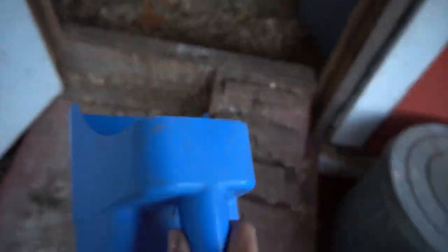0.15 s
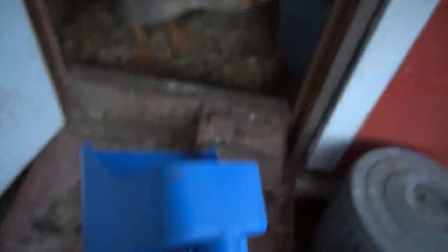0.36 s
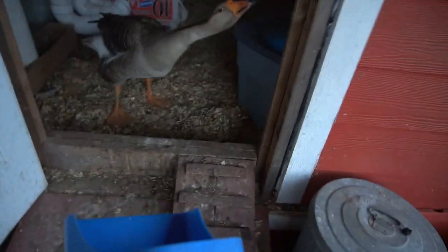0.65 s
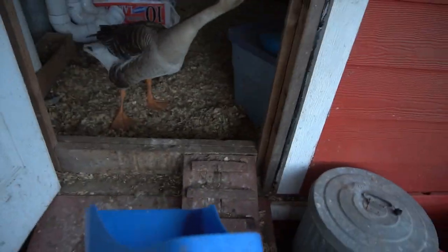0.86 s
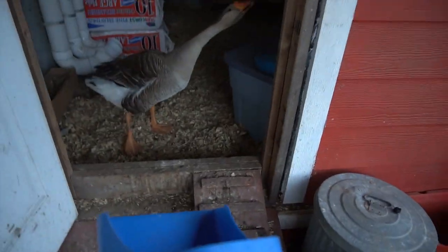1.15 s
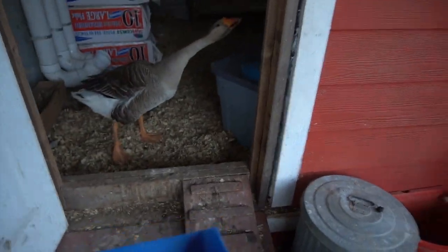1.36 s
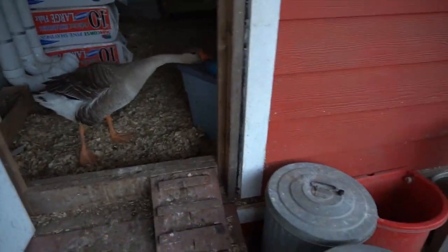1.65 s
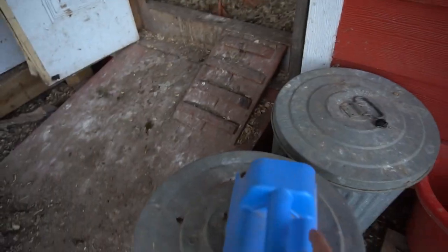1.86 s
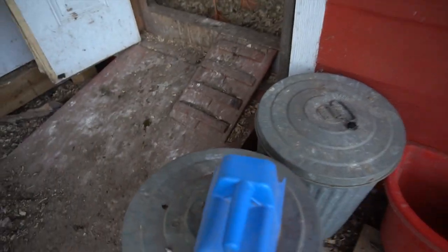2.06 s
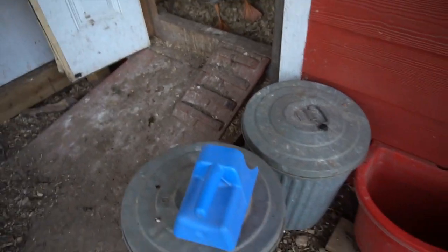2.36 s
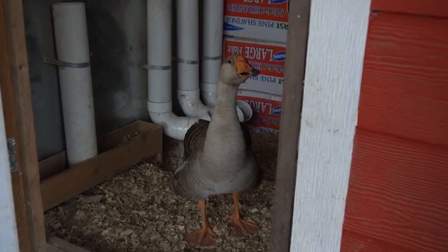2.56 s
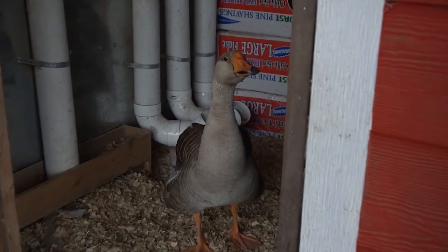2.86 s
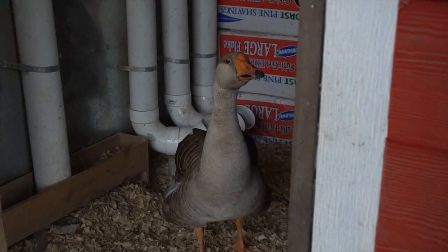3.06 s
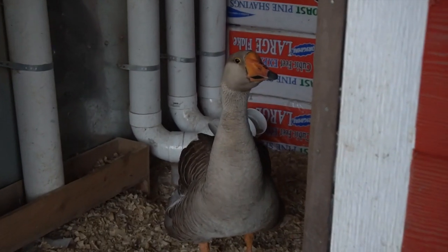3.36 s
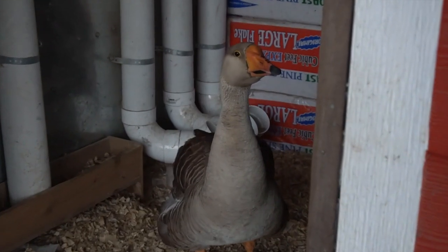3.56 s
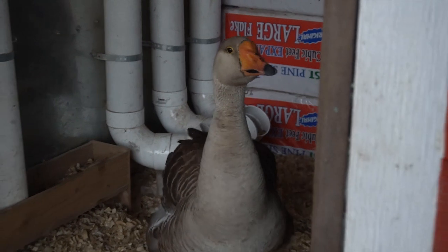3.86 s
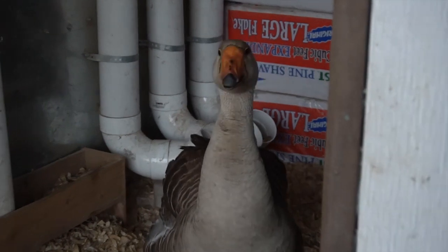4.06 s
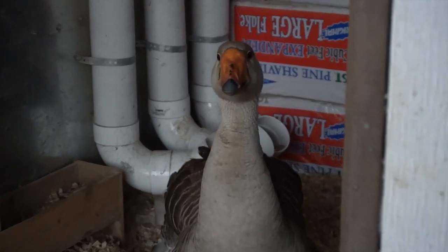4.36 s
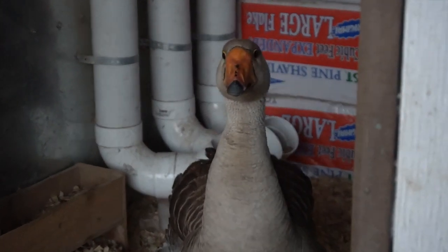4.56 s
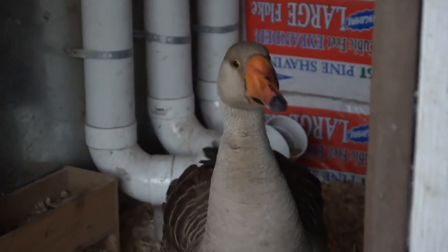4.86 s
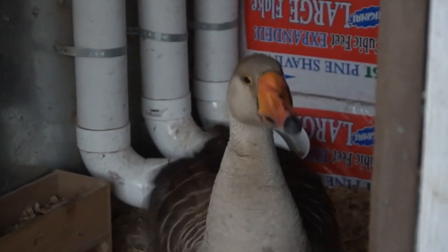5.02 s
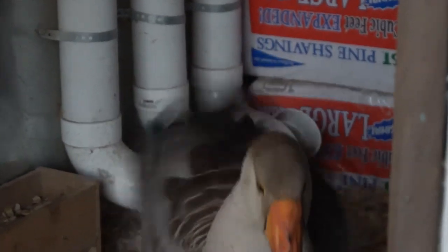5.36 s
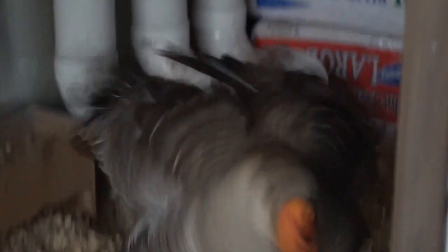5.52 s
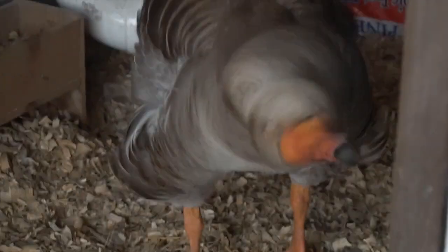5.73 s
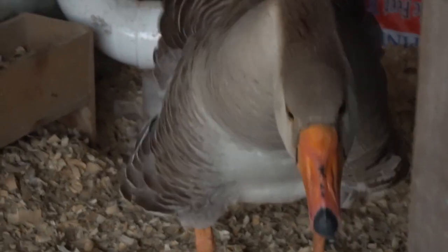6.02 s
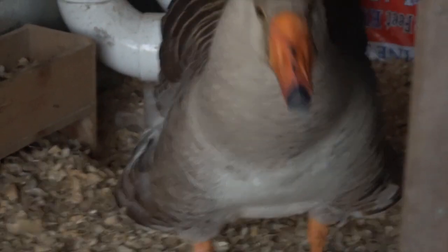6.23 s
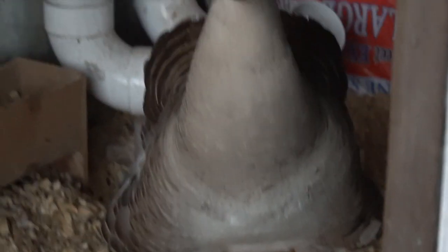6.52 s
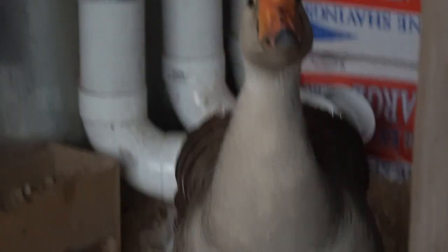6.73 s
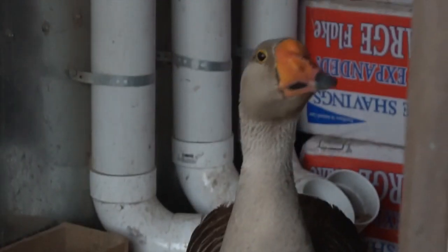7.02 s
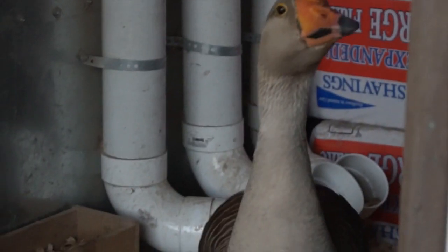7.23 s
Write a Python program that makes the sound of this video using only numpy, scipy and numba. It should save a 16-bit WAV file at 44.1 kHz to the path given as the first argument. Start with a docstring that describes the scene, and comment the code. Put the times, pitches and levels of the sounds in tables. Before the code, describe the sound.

A goose honks harshly about seven times in quick succession from the start until 1.4 seconds, its voice cracking shrilly in the later calls, with the short echo of a small wooden shed. Low wind buffets the microphone, and a hand bumps it at 0.3 and around 1.6 seconds. At 1.7 seconds a plastic scoop clatters onto a bin and rattles away by 2.3. Two short honks follow at 2.5 and 2.7 seconds, and two more at 4.1 and 4.4. A small bird gives one clear, thin peep at 3.7. From about 3 seconds the goose steps lightly on dry shavings and rustles its feathers, busiest between 5.1 and 6 seconds. Very faint peeps come between 6 and 7.2 seconds, and a last honk at 7.3. A faint drone of open air continues throughout.

```python
"""At the door of a small wooden shed bedded with shavings, a goose honks harshly, ruffles its feathers
and steps about. Its voice is a source and filter: pulsing membranes excite resonances of throat and bill.
A plastic feed scoop clatters on a bin, ringing the modes of both, and a small bird peeps in thin whistles.
The boards reflect all these sounds. Wind buffets the microphone and a hand bumps it, over a faint drone."""
import sys
import numpy as np
from scipy import signal
from scipy.fft import rfft, irfft, next_fast_len
from scipy.io import wavfile
from scipy.ndimage import uniform_filter1d
from numba import njit

SR = 44100
rng = np.random.default_rng(int(sys.argv[2]) if len(sys.argv) > 2 else 0)


def file_out(sig):
    """Save sig as 16-bit WAV at sys.argv[1]."""
    # one column per channel
    cols = np.atleast_2d(sig).T
    # limit, then scale
    lim = np.clip(cols, -1, 1)
    pcm = np.round(lim * 32767).astype(np.int16)
    wavfile.write(sys.argv[1], SR, pcm)


N = 325899
TIME = np.arange(N) / SR

# Honks, with the bill wide open. Each row: start, length and attack in seconds, level in dB, relative
# levels of the low, middle and top resonances in dB, pulses per second, share of pitch lost as the bill
# shuts, roughness from 0 to 1, first resonance in Hz, bill resonance in Hz.
HONKS = [(0, 0.024, 0.001, -15, 7, -4, 0.5, 145.3, .03, 0.27, 1045, 3370),
         (.378, .155, 0.026, -23.5, 4, 1, -2.5, 152, .2, 0.26, 770, 3450),
         (.618, .076, 0.029, -25.5, 18, 0.5, -6.5, 140.4, .15, 0.26, 714, 3260),
         (.697, .108, 0.0013, -16, -6, -3, -3, 149, .04, .08, 1145, 3330),
         (.856, .135, .014, -17.5, -7, -2, -1.5, 152, .09, .09, 994, 3000),
         (1.018, .18, 0.097, -16.5, 4.5, -0.5, -6.5, 280, .14, .2, 1180, 2700),
         (1.222, 0.18, 0.0032, -17.5, -4, 0, 0.5, 178, .28, 0.22, 1010, 3370),
         (2.531, .024, 0.00067, -15.5, -3, -4.5, -4, 145, 0.029, 0.28, 1045, 3186),
         (2.713, .112, 0.0086, -18, -5, -4.5, -2.5, 170, .15, .17, 1007, 3185),
         (4.068, 0.097, 0.0068, -13.5, 4, -4.5, -3, 149.5, .02, .17, 946, 3406),
         (4.308, 0.015, 0.0037, -37, 3, -0.5, -14, 142, .03, 0.34, 702.4, 3200),
         (4.401, 0.083, 0.0072, -13.5, 3.5, -5.5, -2, 170, 0.18, 0.09, 1012, 3430),
         (7.286, 0.083, 0.014, -15, 7, -8, -6, 146, 0.044, .15, 940, 3350)]
# Resonances of throat and bill at an average opening. Each row: centre in Hz, width in Hz, gain in dB.
THROAT_LOW = [(551, 78, -12.5)]
THROAT_MID = [(1457, 292, -1), (1727, 204, -0.5), (2050, 170, -5)]
THROAT_TOP = [(2530, 780, -1.5), (3420, 870, 3.5), (4520, 300, -2), (5500, 810, -6.5)]
# Cracks of the voice. Each row: time of the peak in seconds, pitch in Hz, level in dB.
SHRIEKS = [(0.802, 2870, -15), (1.175, 2670, -13), (1.243, 3310, -13), (1.348, 3060, -17)]
# Clear tones in the voice. Each row: start and length in seconds, first and last pitch in Hz,
# level in dB, gain of the overtones in dB.
CLEAR_TONES = [(1.071, .11, 520, 571.4, -36, 13.5), (2.532, 0.0092, 1070, 1026, -13.5, -20),
               (2.71, 0.023, 691, 797, -17.5, -3), (2.735, 0.07, 972, 968, -13, -24),
               (4.067, 0.01447, 660, 732, -27.5, 5.5), (4.403, 0.013, 680, 737, -26.5, 4.5),
               (7.283, .02, 645, 728, -25, 0), (7.326, 0.0298, 1001, 899, -20, -11.5)]
# The scoop lands on the bin. Each row: time in seconds, relative level in dB.
KNOCKS = [(1.735, 1), (1.741, -6), (1.785, -6), (1.8, -10), (1.827, -9), (1.845, -6)]
# Modes of scoop and bin. Each row: frequency in Hz, relative level in dB, 60 dB decay time in seconds.
SCOOP_MODES = [(259.2, -9, 0.34), (425, 2.5, 0.11), (502, -1.5, 0.084), (546, -12.5, 0.86),
               (613, -11, 0.28), (1296, -2, 0.069), (2700, -15, 0.095), (3470, -8, 0.062),
               (5280, -16, 0.043)]
# Steps on shavings. Each row: time in seconds, relative level in dB, extra gain of the thud in dB.
STEPS = [(0.193, -23, -21), (2.927, -19, -21), (3.16, -24.5, -4), (3.793, -29.5, 8.5), (3.864, -28, 7),
         (4.903, -22, -5), (5.399, -19.5, -1.5), (5.493, -24.5, 5), (5.514, -16, -14), (5.665, -14, -9.5),
         (5.767, -21, -21), (5.914, -13, -13), (6.012, -17, -24), (6.766, -26.5, -13)]
# Bouts of rustling. Each row: start and length in seconds, relative levels of crackle and brush in dB.
RUSTLES = [(3.27, .13, -48, -41.5), (3.794, 0.17, -57, -45.5), (4.782, 0.085, -41.5, -61),
           (5.138, 0.4, -44, -42.5), (5.572, 0.08, -36.5, -34.5), (5.712, 0.3, -49, -63),
           (6.59, 0.13, -54, -56)]
# Spectra of the contact noises. Each row: frequency in Hz, relative level in dB.
CLACK_SPECTRUM = [(220, -6.5), (330, -10.5), (430, 2), (700, -3.5), (1000, -5), (1800, -15.5), (3200, -14),
                  (5000, -28), (12000, -57)]
SNAP_SPECTRUM = [(900, 10), (1500, 8.5), (2200, 4), (4000, 9.5), (7000, -2), (12000, -7.5)]
CRACKLE_SPECTRUM = [(1800, 1), (5500, 5.5), (7500, -3), (12000, -5)]
BRUSH_SPECTRUM = [(220, -3), (380, 3), (900, -1), (1600, -4.5), (2800, -12.5)]
# The bird's peeps. Each row: start and length in seconds, first and last pitch in Hz, final level in dB.
PEEPS = [(3.672, 0.09, 3422, 3485, -17), (6.08, .16, 3380, 3210, -60), (6.93, 0.086, 2670, 2780, -44.5),
         (7.126, 0.061, 3260, 3324, -38.5), (7.196, 0.068, 3290, 3048, -44.5)]
# Reverberation of the shed. Each row: frequency in Hz, 60 dB decay time in seconds.
SHED_T60 = [(200, 0.37), (1500, 0.22), (11000, 0.28)]
# Gusts. Each row: time of the peak and half width in seconds, relative level in dB.
GUSTS = [(.08, 0.27, -24), (.52, 0.19, -20.5), (1.58, 0.1352, -18), (2.2, 0.76, -37), (5.6, 0.22, -48)]
# The hand bumps the microphone. Each row: time in seconds, level in dB, length in seconds.
BUMPS = [(0.322, -1.5, 0.011), (0.343, 3, 0.015), (1.513, -2.5, 0.0087), (1.571, 0.5, 0.011),
         (1.631, 2, 0.0083), (1.655, -0.5, 0.0087)]
# Spectra of slow sway, fast buffets and open air. Each row: frequency in Hz, relative density in dB.
SWAY_SPECTRUM = [(8, -6), (12, 2), (24, -4), (45, -36.5), (80, -54.5)]
BUFFET_SPECTRUM = [(35, -15), (58, 4.5), (90, -19), (150, -20.5), (250, -42), (500, -59)]
AIR_SPECTRUM = [(70, 5.5), (95, -3), (120, 6.5), (165, -7.5), (280, -11), (365, -7), (550, -13.5),
                (1300, -17.5), (2300, -27.5), (3600, -28), (6000, -38), (12000, -45.5)]
# Level curves of the sway and of the open air. Each row: time in seconds, level in dB.
SWAY_LEVELS = [(0.0, -16.5), (0.08, -12.5), (0.88, -16.5), (0.97, -30.5), (1.63, -15.5), (1.77, -27),
               (3.48, -16.5), (4.55, -27.5), (6.77, -14), (6.93, -20.5), (7.18, -11.5), (7.39, -22)]
AIR_LEVELS = [(0, -46), (2.5, -46.5), (2.6, -41), (4, -39.5)]


def honks(release_s=.011, bill_lag_s=.012, width_hz=200, flutter_db=2, average_first_hz=913):
    """Source and filter: pulses ring in the throat; opening the bill lifts pitch, resonances and level."""
    age, length, attack, db, low_db, mid_db, top_db, per_s, bend, rough, first_hz, bill_hz = held(HONKS)
    shut = (2 * np.clip(age / (length + bill_lag_s), 0, 1) - 1) ** 2   # 1, 0, 1 over each honk
    db = db - 3.5 * shut
    first_hz = first_hz * .69 ** shut
    bill_hz = bill_hz * .875 ** shut
    mid_db = mid_db - 1.5 + flutter_db * drift(60)
    top_db = top_db - 3 + flutter_db * drift(60)
    slaps, air = syrinx(per_s * (1 - bend * shut), rough)
    # close boards thicken each pulse
    voice = shed(slaps + air / 2, wet_db=3.5)
    hoarse = shed(slaps + air, wet_db=4.5)
    first = gliding(voice, [(first_hz, width_hz, 0)], 1) + from_db(low_db) * resonances(voice, THROAT_LOW)
    first = evened(cut(cut(first, 493, "high", order=8), 1090, "low", order=6))
    scale = (first_hz / average_first_hz) ** .24   # higher resonances partly follow the first
    middle = evened(cut(gliding(voice, THROAT_MID, scale), [1150, 2400], "band", order=3))
    upper = evened(cut(gliding(hoarse, THROAT_TOP, scale), [2100, 5800], "band", order=5))
    bill = moving_resonance(hoarse, 2 * np.pi * bill_hz / SR, np.exp(-np.pi * width_hz / SR))
    bill = from_db(-1) * evened(cut(bill, [2100, 4800], "band"))
    # harder pulses have a sharper edge
    fizz = from_db(-19 + .41 * (db - np.max(db))) * evened(cut(hoarse, [5800, 9500], "band"))
    chest = from_db(-21) * evened(cut(voice, [125, 185], "band"))
    throat = first + chest + from_db(mid_db) * middle + from_db(top_db) * (upper + bill + fizz)
    return envelope(age, length, attack, release_s) * (from_db(db) * throat + shrieks(hoarse))


def syrinx(per_s, rough, jitter=.16, uneven_db=7, leak=.08, puff_s=.0025):
    """Valve action: membranes slap shut in uneven pulses, each releasing a puff of turbulent air."""
    cycles = np.cumsum(per_s * np.exp(jitter * rough * drift(150))) / SR
    slaps = np.diff(np.floor(cycles), prepend=-1) * from_db(uneven_db * rough * drift(300))
    puffs = signal.lfilter([1], [1, -np.exp(-1 / (puff_s * SR))], slaps)
    air = rms_one((puffs + leak * rough) * noise())
    return rms_one(slaps), np.sqrt(np.abs(rough)) * air


def shrieks(hoarse, half_length_s=.012, width_hz=220):
    """Narrow-band resonance: for a moment one high peak takes over the voice."""
    out, treble = 0, cut(hoarse, [2100, 5800], "band")
    for s, hz, db in SHRIEKS:
        ringing = evened(resonances(treble, [(hz, width_hz, 0)]))
        out = out + from_db(db) * np.exp(-((TIME - s) / half_length_s) ** 2) * ringing
    return out


def clear_tones(waver=.00753, rolloff_db=-2.5):
    """Free oscillation: at times the membranes swing at a much higher pitch, giving a harmonic series."""
    out, wobble = 0, waver * drift(300)
    for s, length, start_hz, end_hz, db, overtone_db in CLEAR_TONES:
        phase = glide(TIME - s, length, start_hz, end_hz, wobble)
        gate = envelope(TIME - s, length, attack_s=.0046, release_s=.0083)
        overtones = sum(from_db(rolloff_db * (k - 1.5)) * np.sin(k * phase) for k in range(2, 9))
        out = out + gate * from_db(db) * np.sqrt(2) * (np.sin(phase) + from_db(overtone_db) * overtones)
    return out


def scoop(ring_db=-17, scatter_db=4.84):
    """Impact excitation: each knock rings the damped modes of scoop and bin, with a clack and a crack."""
    s, db = np.transpose(KNOCKS + rattle())
    rings = 0
    for hz, mode_db, t60 in SCOOP_MODES:
        r, angle = from_db(-60 / (t60 * SR)), 2 * np.pi * hz / SR
        hits = strikes(s, db + mode_db + ring_db + rng.normal(0, scatter_db, len(s)))
        rings = rings + signal.lfilter([0, np.sin(angle)], [1, -2 * r * np.cos(angle), r * r], hits + 1e-18)
    clack = bursts(s, db - 11, CLACK_SPECTRUM, t60=.18)
    crack = bursts(s, db - 20, SNAP_SPECTRUM, t60=.016)
    return rings + clack + crack


def rattle(count=11, start_s=1.9, gap_s=.0315, jitter_s=.003, first_db=-17, loss_db=.57):
    """Damped rocking: the scoop knocks on the rim at an almost steady beat, weakening as it goes."""
    bounce = np.arange(count)
    times = start_s + gap_s * bounce + jitter_s * rng.standard_normal(count)
    return list(zip(times, first_db - loss_db * bounce))


def steps():
    """Brittle fracture: dry shavings crack underfoot, over a soft thud."""
    s, db, thud_db = np.transpose(STEPS)
    snaps = bursts(s, db - 9, SNAP_SPECTRUM, t60=.047)
    thuds = bursts(s, db + thud_db - 10, BRUSH_SPECTRUM, t60=.13)
    return snaps + thuds


def rustle(grains_per_s=3000, clump_db=5):
    """Superposition: clumps of tiny contacts in feathers and shavings sum to crackle and dull brushing."""
    grains = noise() * (rng.random(N) < grains_per_s / SR)
    crackle = rms_one(colour(grains, CRACKLE_SPECTRUM))
    brush = rms_one(colour(grains, BRUSH_SPECTRUM))
    bouts = 0
    for s, length, crackle_db, brush_db in RUSTLES:
        contacts = from_db(crackle_db - 1) * crackle + from_db(brush_db - 2) * brush
        bouts = bouts + envelope(TIME - s, length, attack_s=.05, release_s=.036) * contacts
    return from_db(clump_db * drift(70)) * bouts


def peeps(waver=.012, swell_db=8.5, hiss_db=-19, ring_db=-17.5):
    """Nonlinear oscillation: a small bird's thin, hoarse whistles have stronger harmonics when louder."""
    out, wobble = 0, waver * drift(900)
    hiss = from_db(hiss_db) * rms_one(colour(noise(), CRACKLE_SPECTRUM))
    loudest_db = max(row[-1] for row in PEEPS)
    for s, length, start_hz, end_hz, db in PEEPS:
        age = TIME - s
        phase = glide(age, length, start_hz, end_hz, wobble)
        overtones = from_db(-17) * np.sin(2 * phase) + from_db(-20) * np.sin(3 * phase)
        whistle = np.sin(phase) + from_db(.36 * (db - loudest_db)) * overtones
        gate = envelope(age, length, attack_s=.011, release_s=.008)
        # the pitch lingers faintly
        ring = from_db(ring_db) * envelope(age, length, attack_s=length, release_s=.16) * np.sin(phase)
        swell = from_db(db + swell_db * (np.clip(age / length, 0, 1) - 1))
        out = out + swell * (gate * (whistle + hiss) + ring)
    return out


def shed(x, wet_db, first_echo_s=.0037):
    """Reverberation: dense reflections from the boards follow the direct sound and die band by band."""
    t, tail = TIME[:SR // 2], 0
    for low_hz in 100 * 2. ** np.arange(7):
        octave = cut(rng.standard_normal(len(t)), [low_hz, 2 * low_hz], "band")
        tail = tail + octave * from_db(-60 * t / at_hz(SHED_T60, low_hz * np.sqrt(2)))
    tail = tail * (t > first_echo_s)
    reflections = signal.fftconvolve(x, tail / np.sqrt(2 * np.sum(tail ** 2)))[:N]
    wet = from_db(wet_db)
    return (x + wet * reflections) / np.sqrt(1 + wet ** 2)


def wind():
    """Turbulence: pressure sways slowly at the microphone port, and faster buffets swell with each gust."""
    sway = evened(colour(noise(), SWAY_SPECTRUM), window_s=.091)
    buffets = evened(colour(noise(), BUFFET_SPECTRUM), window_s=.24)
    gusts = sum(from_db(db - 1) * np.exp(-((TIME - s) / width) ** 2) for s, width, db in GUSTS)
    return gain_curve(SWAY_LEVELS) * sway + gusts * buffets


def bumps():
    """Pressure pulses: each bump of the hand is one smooth swell; the port passes no steady pressure."""
    pressure = sum(from_db(db) / (1 + (2 * (TIME - s) / length) ** 2) ** 2 for s, db, length in BUMPS)
    return cut(pressure, 10, "high", order=1)


def open_air():
    """Ambient noise: low peaks in a broad spectrum are heard as a faint drone."""
    return gain_curve(AIR_LEVELS) * rms_one(colour(noise(), AIR_SPECTRUM))


def resonances(x, modes):
    """Parallel resonances with alternating signs."""
    out = 0
    for k, (hz, width, db) in enumerate(modes):
        r = np.exp(-np.pi * width / SR)
        feedforward = np.array([1, 0, -1]) * (1 - r * r) / 2
        feedback = [1, -2 * r * np.cos(2 * np.pi * hz / SR), r * r]
        out = out + (-1) ** k * from_db(db) * signal.lfilter(feedforward, feedback, x)
    return out


def gliding(x, modes, scale):
    """Parallel resonances with alternating signs, whose centres all move by one factor."""
    out = 0
    for k, (hz, width, db) in enumerate(modes):
        r = np.exp(-np.pi * width / SR)
        out = out + (-1) ** k * from_db(db) * (1 - r) * moving_resonance(x, 2 * np.pi * hz * scale / SR, r)
    return out


@njit
def moving_resonance(x, angle, r):
    """A two-pole resonator whose centre, in radians per sample, glides."""
    y = np.zeros(len(x))
    for i in range(2, len(x)):
        y[i] = x[i] - x[i - 2] + 2 * r * np.cos(angle[i]) * y[i - 1] - r * r * y[i - 2]
    return y


def strikes(times, db):
    """One impulse of the given level at each time."""
    out = np.zeros(N)
    out[np.clip((np.asarray(times) * SR).astype(int), 0, N - 1)] = from_db(db)
    return out


def bursts(times, db, spectrum, t60):
    """Exponential decay: a puff of coloured noise at each time falls 60 dB in t60 seconds."""
    power = signal.lfilter([1], [1, -from_db(-60 / (t60 * SR)) ** 2], strikes(times, db) ** 2 + 1e-18)
    return np.sqrt(power) * rms_one(colour(noise(), spectrum))


def envelope(age, length, attack_s, release_s):
    """Linear attack, hold, exponential release."""
    return np.clip(age / attack_s, 0, 1) * np.exp(-np.maximum(age - length, 0) / release_s)


def glide(age, length, start_hz, end_hz, wobble):
    """Phase as the integral of a sliding frequency."""
    return 2 * np.pi * np.cumsum(np.interp(age, [0, length], [start_hz, end_hz]) * (1 + wobble)) / SR


def held(rows):
    """At every sample, the time since the latest event began, then that event's columns."""
    rows = np.array(rows)
    latest = np.maximum(np.searchsorted(rows[:, 0], TIME, "right") - 1, 0)
    start, *columns = rows[latest].T
    return [TIME - start] + columns


def gain_curve(rows):
    """Gain at every sample, interpolated in decibels."""
    return from_db(np.interp(TIME, *np.transpose(rows)))


def at_hz(points, hz):
    """Interpolation on a log-frequency axis."""
    points = np.array(points)
    return np.interp(np.log(np.maximum(hz, 1)), np.log(points[:, 0]), points[:, 1])


def colour(x, spectrum):
    """Spectral shaping, falling away steeply past the ends of the spectrum."""
    size = next_fast_len(len(x))
    hz = np.arange(size // 2 + 1) * SR / size + 1
    skirts = np.minimum(hz / spectrum[0][0], 1) ** 3 * np.minimum(spectrum[-1][0] / hz, 1) ** 3
    return irfft(rfft(x, size) * from_db(at_hz(spectrum, hz)) * skirts, size)[:len(x)]


def cut(x, hz, kind, order=2):
    """Butterworth filter."""
    return signal.sosfilt(signal.butter(order, hz, kind, fs=SR, output="sos"), x)


def noise():
    """White noise."""
    return rng.standard_normal(N)


def drift(per_s):
    """Random modulation of unit power, with per_s new values a second."""
    knots = rng.standard_normal(int(N / SR * per_s) + 2)
    return rms_one(np.interp(TIME * per_s, np.arange(len(knots)), knots))


def from_db(db):
    """Decibels to gain."""
    return 10 ** (np.asarray(db) / 20)


def rms_one(x):
    """Scale to unit power."""
    return x / np.sqrt(np.mean(x ** 2) + 1e-20)


def evened(x, window_s=.0074):
    """Unit power from moment to moment."""
    return x / np.sqrt(np.abs(uniform_filter1d(x * x, int(window_s * SR))) + 1e-12)


def scene():
    """Superposition: goose, bedding, bird and scoop echo in the shed; wind, bumps and air add directly."""
    goose = shed(honks() + clear_tones(), wet_db=-10.5)
    bedding = shed(steps() + rustle(), wet_db=-3)
    bird = shed(peeps(), wet_db=1)
    clatter = shed(scoop(), wet_db=-7.5)
    return (goose + bedding + bird + clatter + wind() + bumps() + open_air())[None]


def record(dry, cutoff_hz=12100):
    """Clipping and band limiting: peaks flatten at full scale, then the top is cut."""
    return signal.sosfilt(signal.ellip(10, .2, 60, cutoff_hz, fs=SR, output="sos"), np.clip(dry, -1, 1))


dry = scene()
out = record(dry)
file_out(out)
```